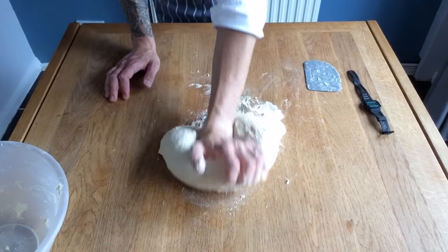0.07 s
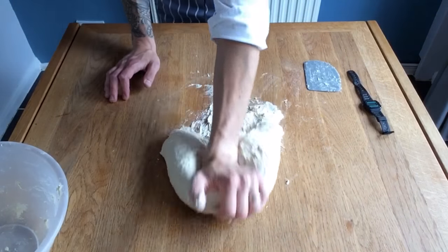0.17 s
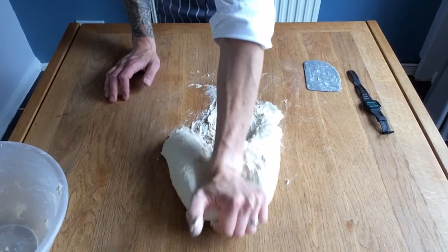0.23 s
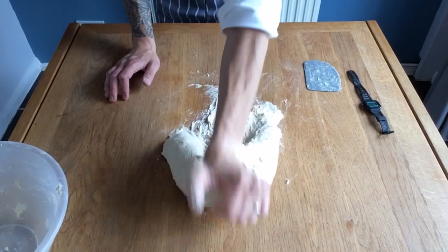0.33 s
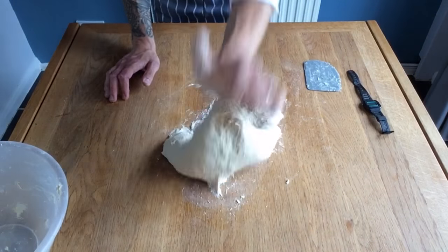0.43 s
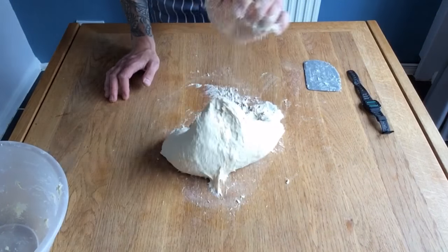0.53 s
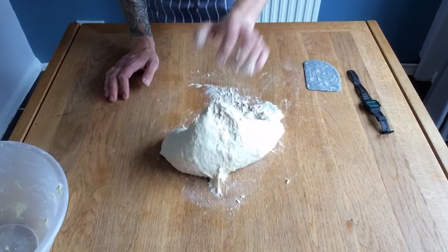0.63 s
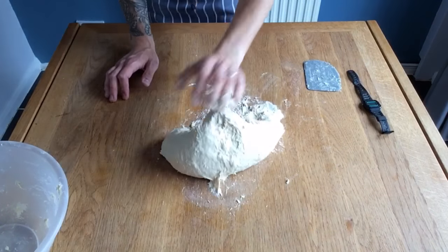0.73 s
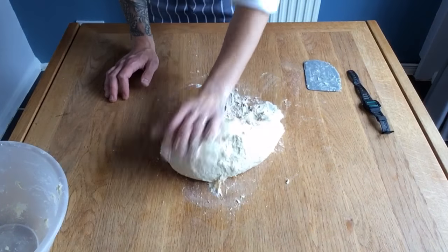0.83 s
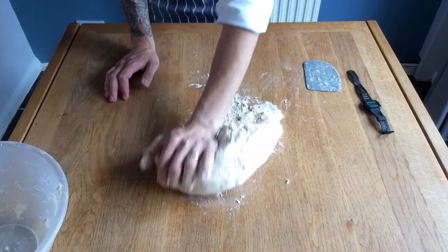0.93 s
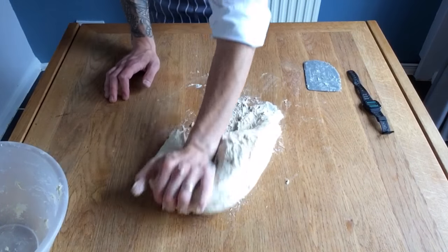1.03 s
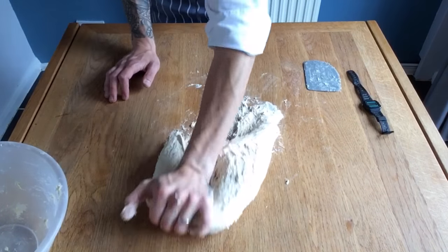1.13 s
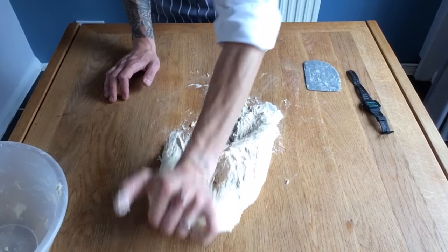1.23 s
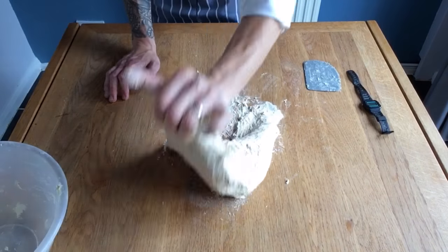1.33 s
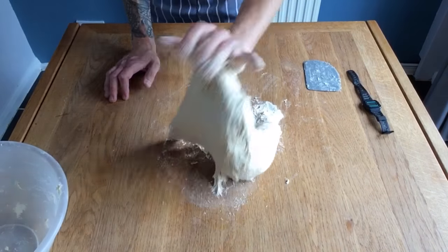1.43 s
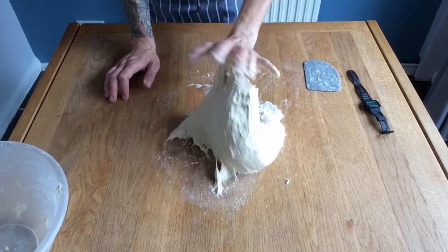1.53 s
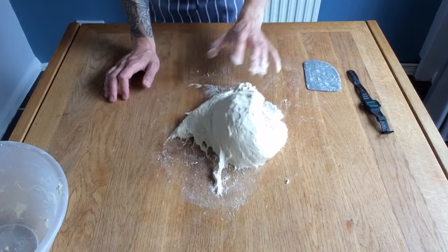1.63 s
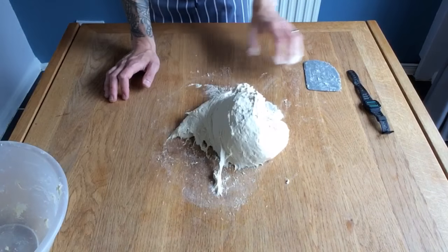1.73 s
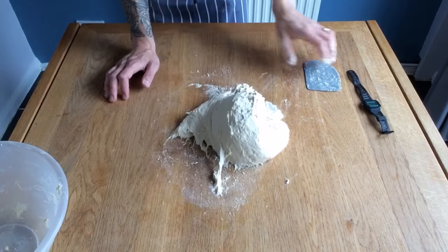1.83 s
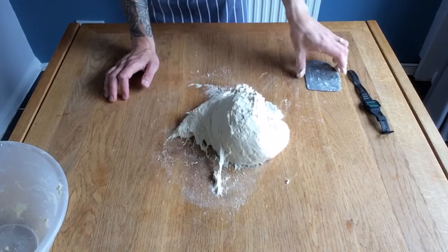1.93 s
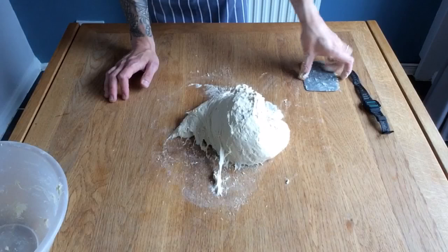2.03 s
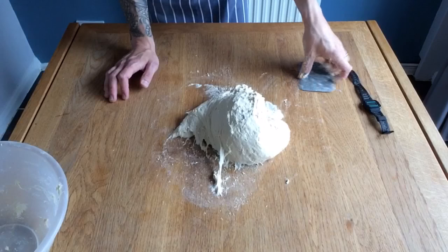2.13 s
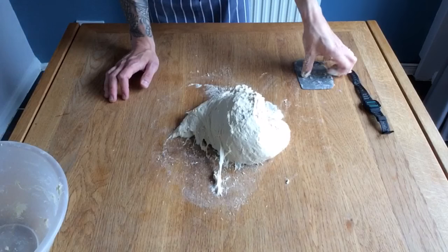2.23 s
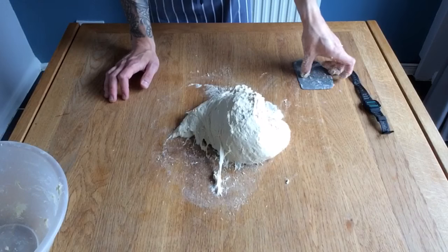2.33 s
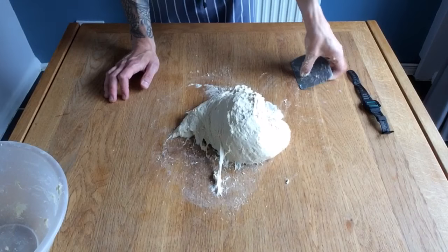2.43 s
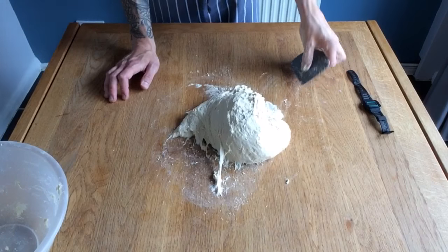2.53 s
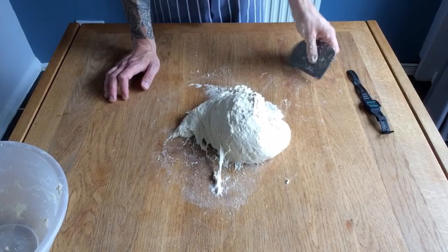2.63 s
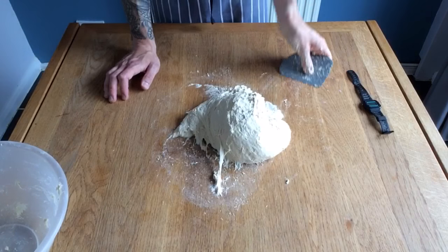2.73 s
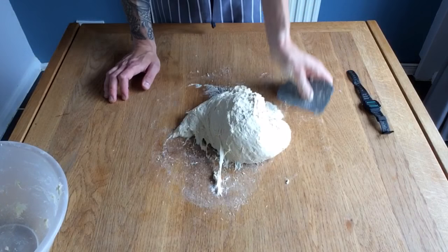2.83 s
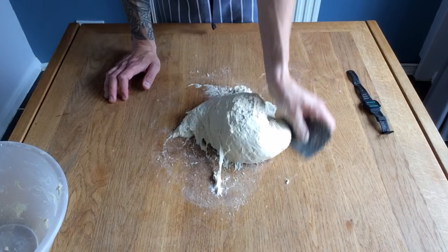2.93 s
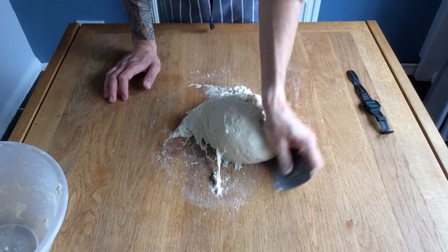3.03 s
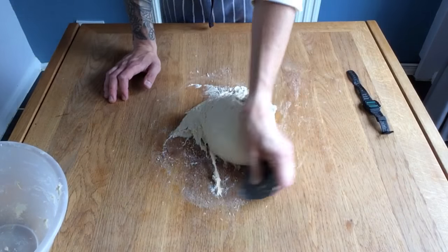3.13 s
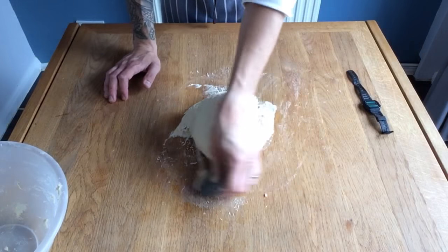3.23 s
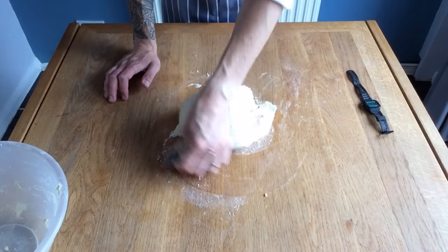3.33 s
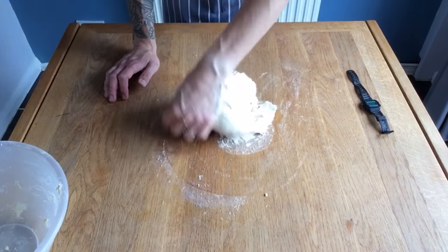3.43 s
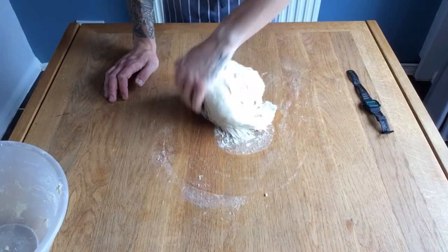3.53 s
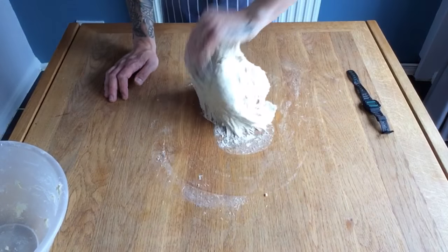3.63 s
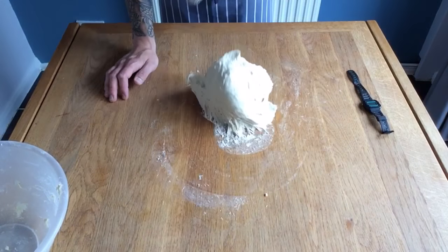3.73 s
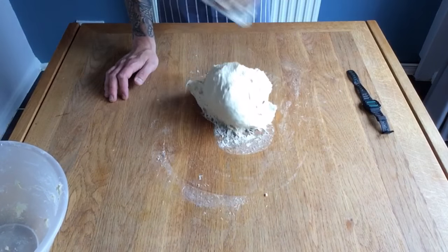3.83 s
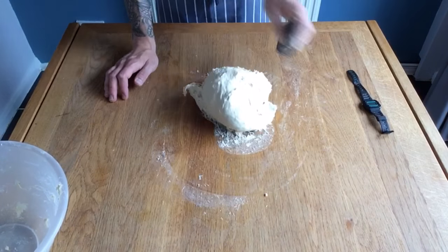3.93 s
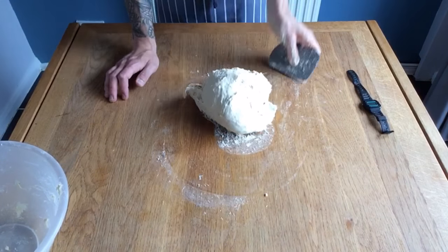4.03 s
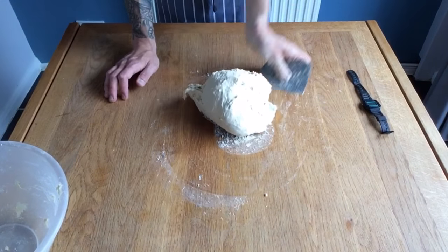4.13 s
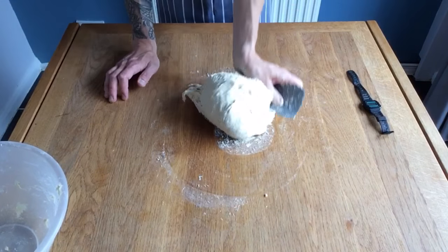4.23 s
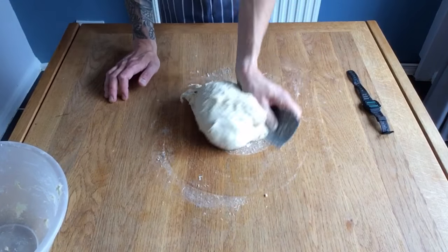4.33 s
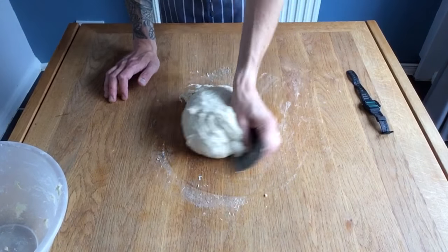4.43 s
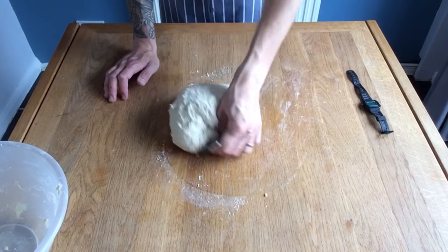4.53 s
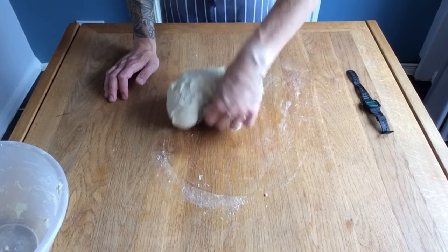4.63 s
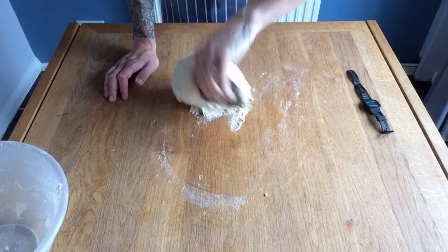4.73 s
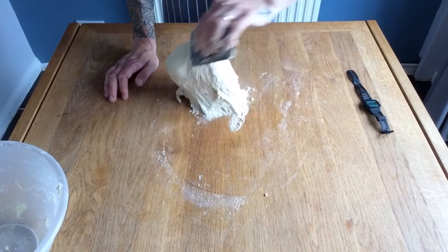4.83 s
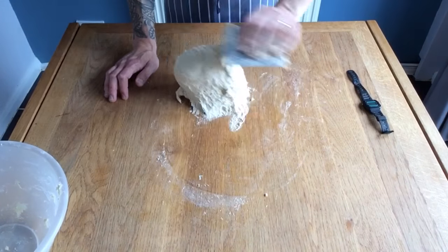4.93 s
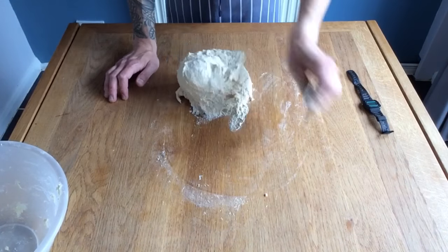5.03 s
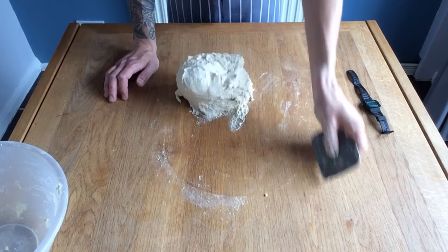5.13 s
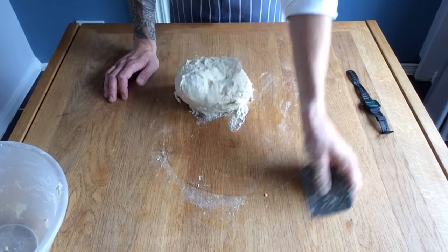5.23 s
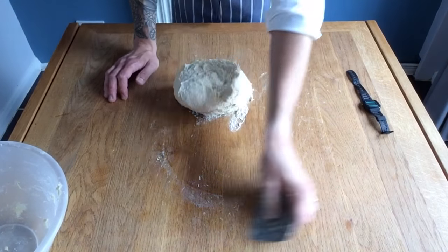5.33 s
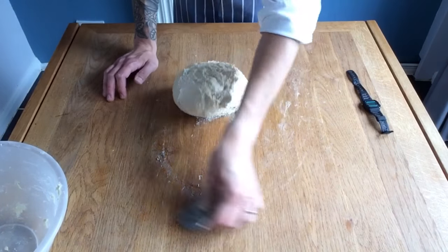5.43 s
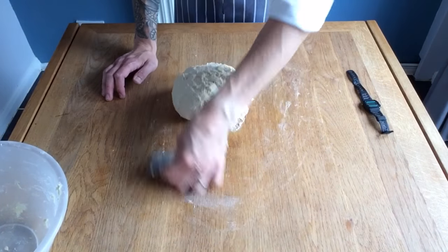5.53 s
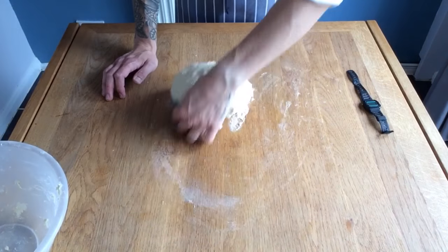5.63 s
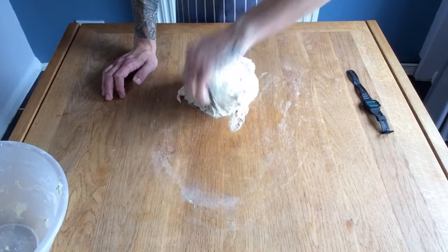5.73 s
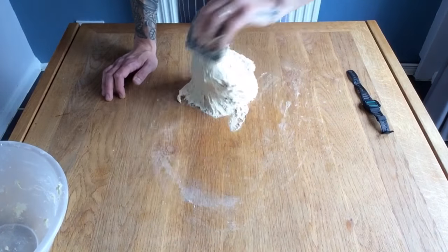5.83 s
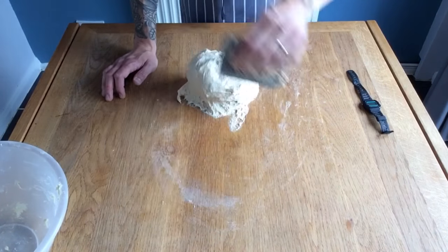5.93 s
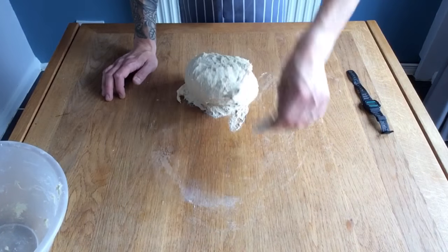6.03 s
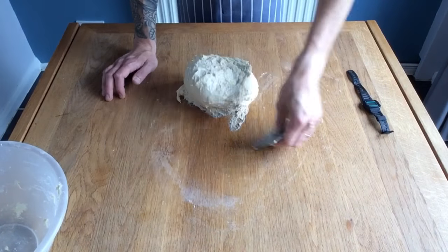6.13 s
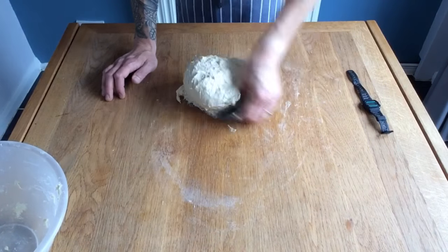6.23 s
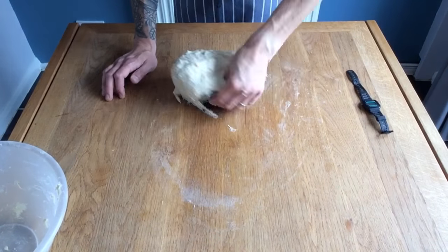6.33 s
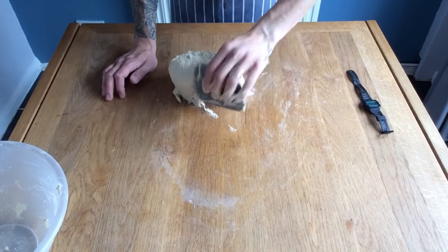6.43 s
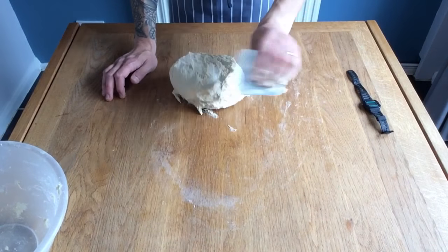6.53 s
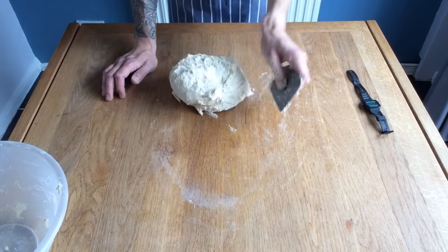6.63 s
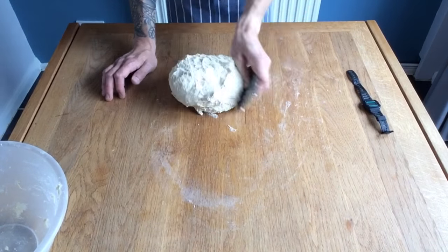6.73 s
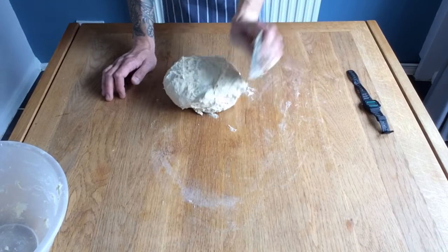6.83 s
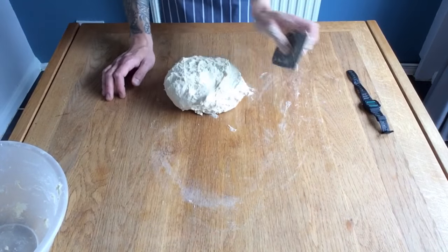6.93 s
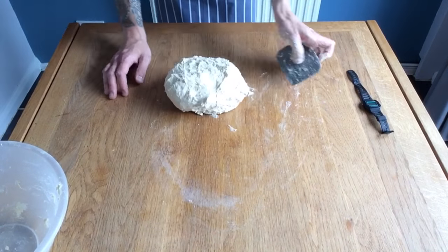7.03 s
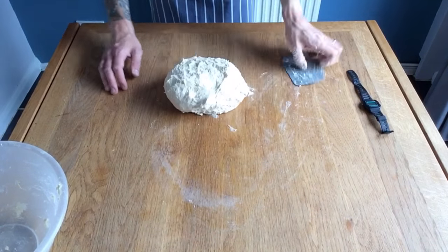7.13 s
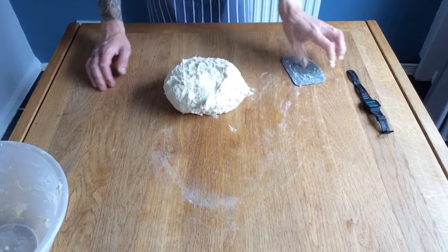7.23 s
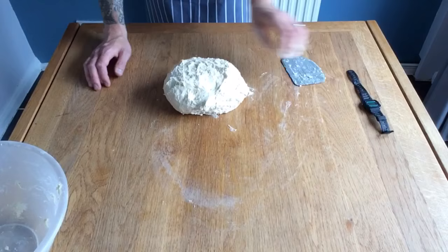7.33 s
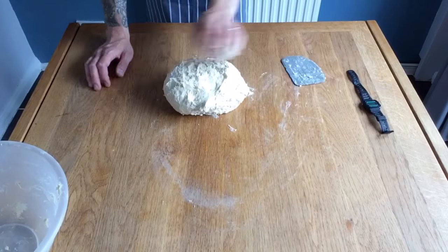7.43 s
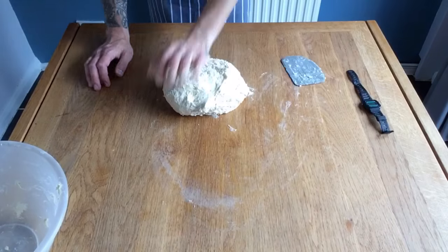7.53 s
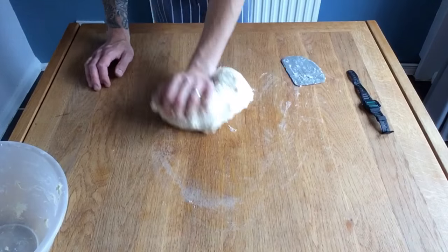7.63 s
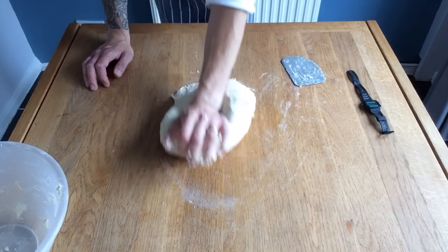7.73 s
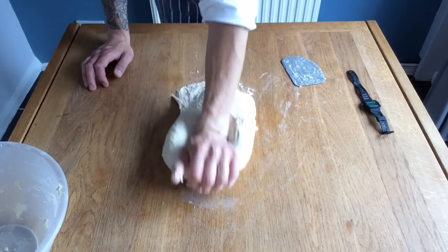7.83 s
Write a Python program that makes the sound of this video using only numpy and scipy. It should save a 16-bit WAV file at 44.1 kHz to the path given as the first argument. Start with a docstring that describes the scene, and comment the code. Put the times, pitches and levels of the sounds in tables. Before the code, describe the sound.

Sticky dough is softly patted and peeled on a wooden table, then a plastic scraper rasps across it in several sweeps and clatters down.

```python
"""Sticky dough peels off a wooden table with a fine crackle and is slapped down with soft pats.
The crackle is many tiny threads of dough letting go. A plastic scraper is picked up with a clack
and rasps over the wood in several sweeps, its edge sticking and slipping, while the gathered lump
bumps along. The scraper gives one sharp flick and is dropped. The table top rings with it all,
and the small kitchen adds a short echo and a faint hum."""
import sys
import numpy as np
from scipy import signal
from scipy.fft import rfft
from scipy.io import wavfile
from scipy.ndimage import uniform_filter1d

SR = 44100
rng = np.random.default_rng(int(sys.argv[2]) if len(sys.argv) > 2 else 0)


def waveform_to_disk(signal):
    """Save audio, clipped to [-1, 1], as 16-bit WAV at the path in sys.argv[1]."""
    frames = np.transpose(np.atleast_2d(signal))
    scaled = np.clip(frames, -1, 1) * 32767
    samples = np.round(scaled).astype(np.int16)
    wavfile.write(sys.argv[1], SR, samples)


N = 347508

# Levels in a table compare its rows; the functions set the final loudness.
# dough peels from wood and fingers: (start [s], rise [s], fall [s], level [dB], extra for suction [dB])
DOUGH_PEELS = [(0, 0.012, 0.49, -67.5, 5), (0.099, .08, 0.42, -69.5, 8), (.31, 0.12, 0.2, -56, 6),
               (1.19, 0.13, 0.34, -55.5, 6), (1.56, .1, .13, -67.5, -1.5), (2.115, 0.026, 0.026, -56, 9),
               (3.66, 0.075, .04, -59, -6), (4.81, 0.038, 0.079, -59, -16.5),
               (4.91, 0.053, 0.053, -68.5, -4), (5.819, 0.074, 0.041, -61.5, -5),
               (6.38, 0.074, 0.12, -64.5, 5), (6.505, 0.027, 0.019, -60.5, -5), (7.38, 0.055, .07, -68, -3),
               (7.7, 0.12, 0.097, -66, 12.5)]
# soft pats of dough and hand: (time [s], level [dB], dull above [Hz], contact time [s])
DOUGH_PATS = [(0.102, -37, 1200, 0.02), (.208, -50.5, 1130, .022), (.932, -63, 1500, 0.013),
              (1.3, -53, 500, 0.017), (1.621, -55, 395, 0.063), (1.66, -48.5, 296, 0.049),
              (1.688, -46.5, 1380, 0.013), (2.028, -50, 150, 0.04), (2.064, -57.5, 1100, .026),
              (2.14, -38, 126, 0.033), (2.329, -47.5, 190, 0.031), (7.263, -38, 120, 0.028),
              (7.631, -54, 402, .024), (7.695, -58.5, 297, 0.023), (7.836, -58, 900, .018)]
# scraper and knuckles hit the table: (time [s], wood thump [dB], plastic clack [dB], sharp tick [dB])
TABLE_KNOCKS = [(2.107, -39, -56, -63), (2.134, -32, -64, -63), (2.326, -47, -57, -64.5),
                (2.756, -50.5, -58, -70), (3.99, -65, -65, -80), (4.139, -54, -50, -75),
                (4.1464, -52, -32, -52), (5.258, -59, -34.5, -54), (6.22, -53, -61, -68),
                (6.2314, -48, -39, -67), (7.1648, -39, -39, -49.5), (7.182, -39, -29.5, -40.5),
                (7.2411, -22.5, -28, -46), (7.627, -70, -58.5, -57), (7.838, -50.5, -53.5, -71)]
# short flicks of the blade's edge: (time [s], level [dB], length [s])
EDGE_FLICKS = [(2.238, -72.5, 0.028), (2.391, -69, .019), (2.488, -63, 0.028), (3.717, -66.5, 0.0034),
               (4.832, -74.5, 0.014), (4.857, -75, .003), (6.527, -63.5, 0.0022), (6.783, -37, 0.022),
               (7.058, -65, 0.0037)]
# pushes of the scraper, a few to each sweep: (start [s], rise [s], fall [s], level [dB],
# extra for grit [dB], extra for rumble [dB], blade pitch at the peak [Hz])
SCRAPER_PUSHES = [(2.53, 0.16, 0.42, -68, -12, 5, 990), (2.77, 0.15, 0.34, -31, -8.5, -14, 1115),
                  (2.99, 0.099, 0.13, -34, -14.5, -14, 1530), (3.15, 0.13, 0.26, -41.5, -9, -11.5, 1430),
                  (3.311, 0.044, 0.18, -38.5, -12.5, -15, 1220),
                  (3.409, 0.024, 0.21, -45.5, -5.5, -9.5, 1550),
                  (4.152, 0.089, 0.082, -26, -9.5, -10.5, 1470),
                  (4.31, 0.059, 0.29, -38.5, -13.5, -11, 1260),
                  (4.44, 0.085, 0.19, -36.5, -10, -11.5, 1520), (5.247, 0.075, 0.29, -30, -9, -21, 1010),
                  (5.32, 0.055, .2, -32, 1, -14, 1420), (5.52, 0.081, 0.12, -37, -9.5, -10, 1370),
                  (5.59, 0.07, 0.061, -39, -1, -15, 1690), (6.224, 0.04, 0.16, -38.5, -8.5, -7.5, 1500)]
# the lump of dough bumps along the table: (time [s], level [dB])
DOUGH_BUMPS = [(4.289, -56), (5.684, -46.5), (5.713, -46.5), (6.344, -49), (7.268, -47)]

# the tone of each sound, from bass to treble: (frequency [Hz], level [dB])
THREAD_TONE = [(300, -19), (1500, -0.5), (3000, 1), (7500, 2.5), (9000, -1), (15500, 0)]
SUCTION_TONE = [(30, -27), (120, -7.5), (280, 4), (550, -0.5), (900, -4.5), (1600, -6), (3000, -14.5),
                (8000, -38)]
AIR_TONE = [(15, -51), (25, -28), (69, -9.5), (93, -10.5), (125, -10), (158, -6.5), (264, -15),
            (301, -12.5), (475, -17), (709, -18), (1500, -25.5), (2130, -27.5), (2780, -28.5), (5010, -32),
            (15000, -38.5)]
PAT_TONE = [(25, -24), (80, -20.5), (150, -1), (250, 1), (400, 0), (700, -6.5), (1080, -1), (1500, -7),
            (2000, 0), (2600, -7), (4000, -2.5), (15000, -19.5)]
THUMP_TONE = [(20, -53), (70, -24), (150, -17.5), (260, -4), (370, 5), (480, -1), (700, -16.5),
              (1200, -36.5), (4000, -69)]
CLACK_TONE = [(200, -14.5), (600, -1.5), (1000, -4.5), (1400, 0.5), (1800, -2.5), (2300, -12), (3500, -18),
              (7000, -44)]
TICK_TONE = [(800, -14), (3000, 18), (6000, 5.5), (8000, 4.5), (10000, -25.5), (15000, -25)]
FLICK_TONE = [(25, -44), (80, -12.5), (250, 4), (700, 0), (1400, 3.5), (2400, -0.5), (3300, -11.5),
              (5000, -10), (7500, -12), (9000, -36), (15500, -64)]
CATCH_TONE = [(200, -12), (700, -5), (1200, -5), (1700, -6), (2300, -4), (4000, -14), (12000, -27)]
RASP_TONE = [(200, -51.5), (500, -6), (900, -5), (1600, -1.5), (2200, -9), (2800, -3.5), (3800, -6.5),
             (5500, -28), (12000, -41)]
GRIT_TONE = [(1500, -40), (3200, -3.5), (4800, 3), (6000, 1.5), (7700, 1), (8500, -6), (11000, -9.5),
             (15500, -11)]
RUMBLE_TONE = [(25, -43), (60, -16), (120, -7.5), (260, -0.5), (400, 0.5), (650, -8.5), (1000, -17.5),
               (2000, -22)]
BUMP_TONE = [(20, -34), (40, -14), (70, 2), (130, -5), (250, -5), (800, -40), (3000, -88), (12000, -100)]

# steady hums of the room: (pitch [Hz], filter width [Hz], level [dB])
ROOM_HUMS = [(151.3, 20, -71), (317, 140, -76.5), (1980, 260, -82.5)]
# the notes the table top rings at: (pitch [Hz], level [dB], time to fade by 60 dB [s])
TABLE_NOTES = [(132.8, 7.5, 0.42), (257.6, 8, 0.29), (341, -11, 0.39), (380, 1.5, 0.45), (520, -21, 0.79),
               (643, -4, 0.19), (728, 6.5, 0.22), (949, 1, .3), (1105, 0, 0.24), (1220, -11, 0.36),
               (1520, -1, 0.41), (1735, -19, 0.37)]
# how long the kitchen echoes: (frequency [Hz], time to fade by 60 dB [s])
ECHO_TIMES = [(150, 0.5), (400, 0.47), (1000, 0.43), (2800, 0.38), (7000, 0.31), (15000, 0.4)]


def amp(db):
    """Turns decibels into a number to multiply by."""
    return 10 ** (np.asarray(db) / 20)


def unit(x):
    """Scales a sound to an average power of one."""
    return x / np.sqrt(np.mean(x ** 2) + 1e-20)


def look_up(table, hz):
    """Reads between a table's rows, with frequencies spaced like musical pitch."""
    row_hz, value = np.transpose(table)
    return np.interp(np.log(hz + 1), np.log(row_hz + 1), value)


def add(mix, start, sound):
    """Mixes a sound in at a start time in seconds."""
    part = mix[max(round(start * SR), 0):][:len(sound)]
    part += sound[:len(part)]


def click(tone, size=2048):
    """A single click with the given tone and an energy of one."""
    log_gain = np.log(amp(look_up(tone, abs(np.fft.fftfreq(size, 1 / SR)))))
    spectrum = np.exp(np.conj(signal.hilbert(log_gain)))  # packs the energy at the start
    pulse = np.fft.ifft(spectrum).real
    return pulse / np.linalg.norm(pulse)


def colour(x, tone):
    """Gives plain noise a tone while keeping its power."""
    return signal.oaconvolve(x, click(tone))[:len(x)]


def resonate(x, hz, width_hz):
    """Makes noise ring around a steady or sliding pitch."""
    turn = np.exp(2j * np.pi * np.cumsum(hz * np.ones(len(x))) / SR)
    decay = np.exp(-np.pi * width_hz / SR)
    ringing = turn * signal.lfilter([1], [1, -decay], x / turn + 1e-18)
    return np.sqrt(2 * (1 - decay * decay)) * ringing.real


def slips(per_s, spread_db):
    """A random stream of tiny snaps; the further the spread is from zero, the more uneven they are."""
    size = amp(spread_db * np.minimum(rng.exponential(1, N), 4))
    return unit(size * rng.standard_normal(N) * (rng.random(N) < per_s / SR))


def swell(start, rise, fall, rise_db, fall_db, rise_shape, fall_shape):
    """One move of the hand builds to one, then eases off; shapes above one round the top."""
    gain = np.zeros(N)
    t = np.arange(SR) / SR
    building = np.maximum(1 - t / rise, 0)
    easing = np.maximum(t - rise, 0) / fall
    add(gain, start, amp(-rise_db * building ** rise_shape - fall_db * easing ** fall_shape))
    return gain


def contact(length, fade_s):
    """Noise that holds while two things touch, then dies away."""
    t = np.arange(SR // 4) / SR
    return rng.standard_normal(len(t)) * np.exp(-np.maximum(t - length, 0) / fade_s)


def peeling():
    """Countless sticky threads let go as the dough lifts; wide patches also suck at the wood."""
    pull, suction = np.zeros((2, N))
    for start, rise, fall, db, suction_db in DOUGH_PEELS:
        lift = amp(db) * swell(start, rise, fall, rise_db=20.5, fall_db=23,
                               rise_shape=1.36, fall_shape=1.34)
        pull += lift
        suction += lift * amp(suction_db)
    threads = colour(pull * slips(per_s=4500, spread_db=-1), THREAD_TONE)
    pockets = colour(suction * slips(per_s=1700, spread_db=1), SUCTION_TONE)
    return amp(-0.5) * threads + amp(-7.5) * pockets


def room_tone():
    """Soft low noise and faint hums lie under the whole scene."""
    room = amp(-65) * unit(colour(rng.standard_normal(N), AIR_TONE))
    for hz, width_hz, db in ROOM_HUMS:
        broad_hum = resonate(rng.standard_normal(N), hz, width_hz)
        room += amp(db) * unit(resonate(broad_hum, hz, width_hz))
    return room


def pats():
    """Dough lands bit by bit; each landing has its own dullness."""
    out = np.zeros(N)
    for start, db, dull_hz, length in DOUGH_PATS:
        muffle = signal.butter(2, dull_hz, fs=SR)
        soft = signal.lfilter(*muffle, contact(length, fade_s=0.0042))
        wet = amp(-40) * contact(length, fade_s=0.01)
        boost = np.sqrt(1500 / dull_hz)  # keeps dull pats from being quieter
        add(out, start, amp(db) * (soft + wet) * boost)
    return amp(3.5) * colour(out, PAT_TONE)


def chatter(rattle_db, fade_s):
    """One clean blow, then a quickly dying rattle of the surfaces that met."""
    rattle = contact(0, fade_s)
    blow = amp(rattle_db) * rattle / np.linalg.norm(rattle)
    blow[0] = 1
    return blow / np.linalg.norm(blow)


def knocks():
    """Each blow thumps the wood, clacks the plastic and ticks at the edge."""
    out = np.zeros(N)
    for start, thump_db, clack_db, tick_db in TABLE_KNOCKS:
        thump = amp(thump_db) * colour(chatter(rattle_db=-4, fade_s=0.0088), THUMP_TONE)
        clack = amp(clack_db) * colour(chatter(rattle_db=2.5, fade_s=0.015), CLACK_TONE)
        tick = amp(tick_db) * colour(chatter(rattle_db=-2, fade_s=0.013), TICK_TONE)
        add(out, start, amp(24.5) * (thump + clack + tick))
    return out


def flicks(start_hz=3700, end_hz=2200):
    """The edge skids for an instant and springs free; its squeak falls as the blade unbends."""
    out = np.zeros(N)
    for start, db, length in EDGE_FLICKS:
        skid = colour(contact(length, fade_s=0.01), FLICK_TONE)
        squeak_hz = np.interp(np.arange(len(skid)) / SR, [0, length], [start_hz, end_hz])
        squeak = resonate(contact(length, fade_s=0.0025), squeak_hz, width_hz=490)
        add(out, start, amp(db) * (amp(8) * skid + amp(3.5) * squeak))
    return out


def pushing(grit_db_per_s=19, blade_hz_per_s=840):
    """The hand's force, grit, table shake and blade pitch over time; the strongest push sets the tone."""
    t = np.arange(N) / SR
    power, grit, rumble, blade = np.zeros((4, N))
    for start, rise, fall, db, grit_db, rumble_db, hz in SCRAPER_PUSHES:
        shape = swell(start, rise, fall, rise_db=26.5, fall_db=26.5, rise_shape=1.52, fall_shape=0.94)
        push = (amp(db) * shape) ** 2
        past_peak = t - start - rise
        power += push
        grit += push * (grit_db + grit_db_per_s * past_peak)  # grittier as the edge gathers flour
        rumble += (amp(db + rumble_db) * shape ** 0.52) ** 2  # swells and fades less than the force
        blade += push * (hz + blade_hz_per_s * past_peak)  # the blade stiffens as it meets the dough
    return np.sqrt(power), grit / (power + 1e-20), np.sqrt(rumble), blade / (power + 1e-20)


def scraper():
    """The edge sticks and slips on floury wood; the blade's pitch shifts as it bends."""
    force, grit_db, shake, blade_hz = pushing()
    wobble = unit(uniform_filter1d(rng.standard_normal(N), size=300))
    judder = force * amp(1.44 * wobble)  # the whole edge catches together
    catches = colour(judder * slips(per_s=3000, spread_db=-0.5), CATCH_TONE)
    blade = amp(-10.5) * resonate(catches, blade_hz, width_hz=480)
    rasp = amp(-8) * colour(judder * slips(per_s=5000, spread_db=2), RASP_TONE)
    grit = amp(-3.5) * colour(force * slips(per_s=14000, spread_db=3.5) * amp(grit_db), GRIT_TONE)
    rumble = amp(-6.5) * colour(shake * slips(per_s=2300, spread_db=5), RUMBLE_TONE)
    return blade + rasp + grit + rumble


def bumps():
    """The heavy lump gives the table a deep, dead push."""
    out = np.zeros(N)
    thud = click(BUMP_TONE, size=4096)
    for start, db in DOUGH_BUMPS:
        add(out, start, amp(db + 27) * thud)
    return out


def table_ring(x):
    """The wooden top rings at its own notes, each fading at its own speed."""
    t = np.arange(SR // 2) / SR
    ring = sum(amp(db - 60 * t / fade_s) * np.sin(2 * np.pi * hz * t) for hz, db, fade_s in TABLE_NOTES)
    return signal.oaconvolve(x, ring / abs(rfft(ring)).max())[:N]


def reflections(gap_s=0.0058, build_s=0.0059):
    """Sound bounces many times off hard walls; each frequency dies at its own speed."""
    size = SR * 2 // 3
    bounces = rng.choice([-1., 1.], size) * (rng.random(size) < 0.12)
    hz, t, bands = signal.stft(bounces, SR, nperseg=256)
    fading = amp(-60 * t / look_up(ECHO_TIMES, hz)[:, None])
    tail = signal.istft(bands * fading, SR, nperseg=256)[1]
    tail *= np.clip((np.arange(len(tail)) / SR - gap_s) / build_s, 0, 1)
    return tail / np.linalg.norm(tail)


def kitchen_echo(x, count=3, moves_per_s=1.204):
    """A few echo patterns blend in turn, as when the hand travels over the table."""
    turn = np.pi * moves_per_s * np.arange(N) / SR
    shares = [np.sqrt(2 / count) * np.cos(turn + np.pi * k / count) for k in range(count)]
    return sum(signal.oaconvolve(x * share, reflections())[:N] for share in shares)


def scene():
    """Blows and rubbing are heard directly, set the table ringing and echo round the kitchen."""
    blows = knocks() + pats() + flicks() + bumps()
    rubbing = scraper() + peeling()
    direct = blows + rubbing
    ring = table_ring(amp(11) * blows + amp(7.5) * rubbing)
    return (direct + ring + amp(-4.5) * kitchen_echo(direct) + room_tone())[None]


def record(dry):
    """Cuts away the very highest treble."""
    treble_cut = signal.firwin(511, cutoff=15450, window=("kaiser", 9), fs=SR)
    return signal.oaconvolve(dry, treble_cut[None], "same")


dry = scene()
out = record(dry)
waveform_to_disk(out)
```